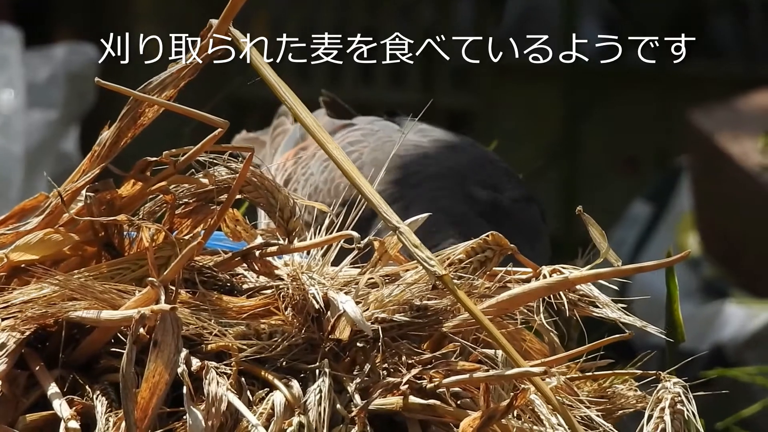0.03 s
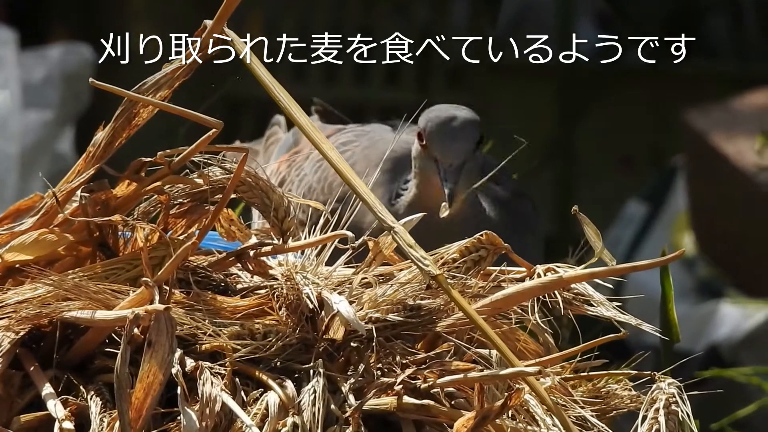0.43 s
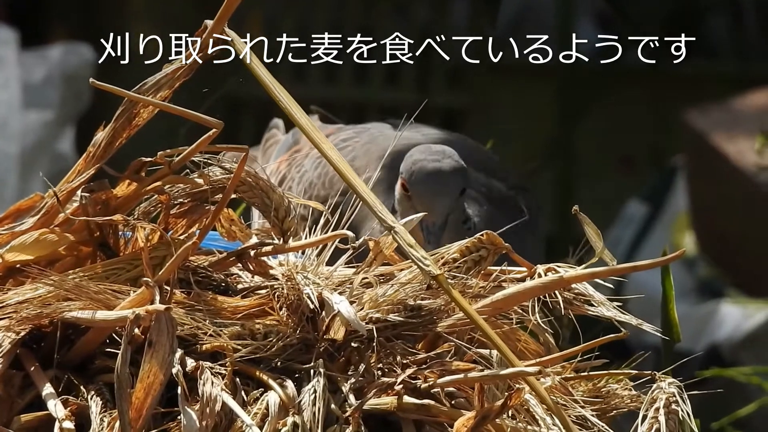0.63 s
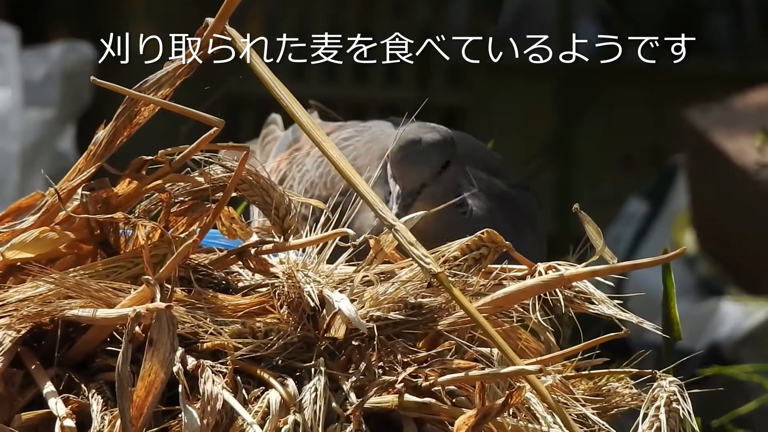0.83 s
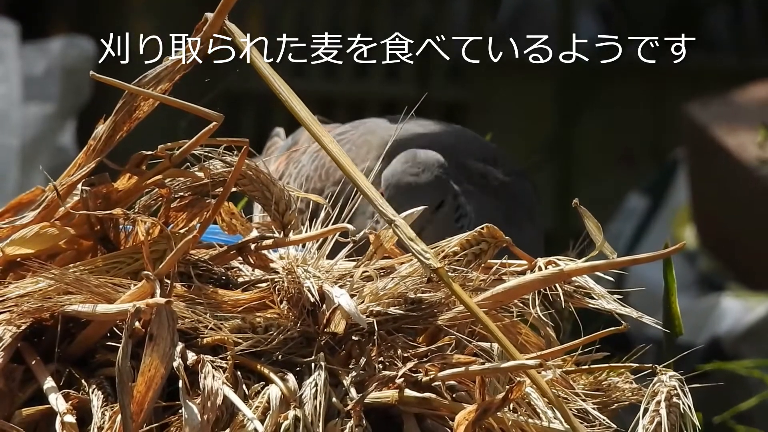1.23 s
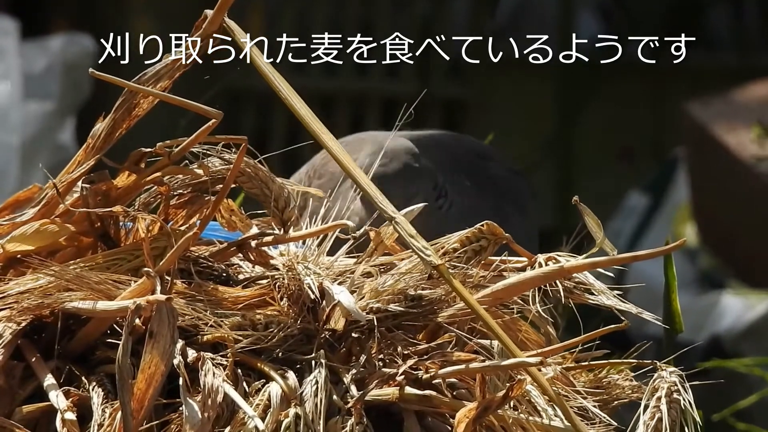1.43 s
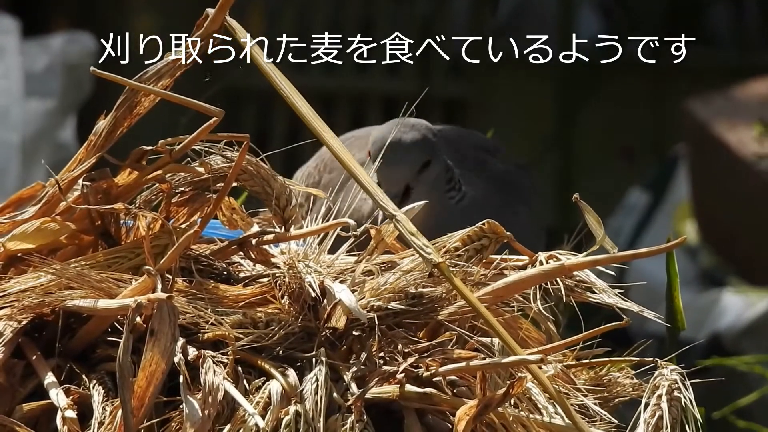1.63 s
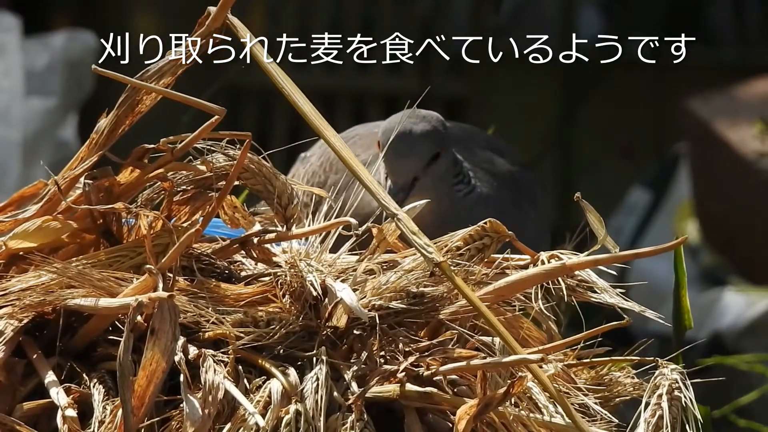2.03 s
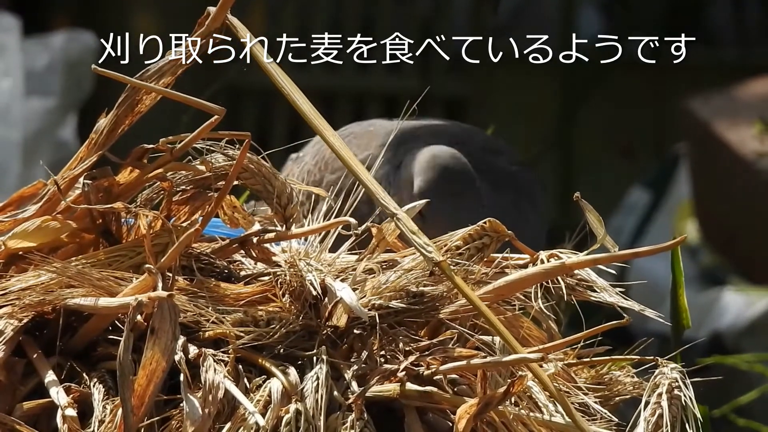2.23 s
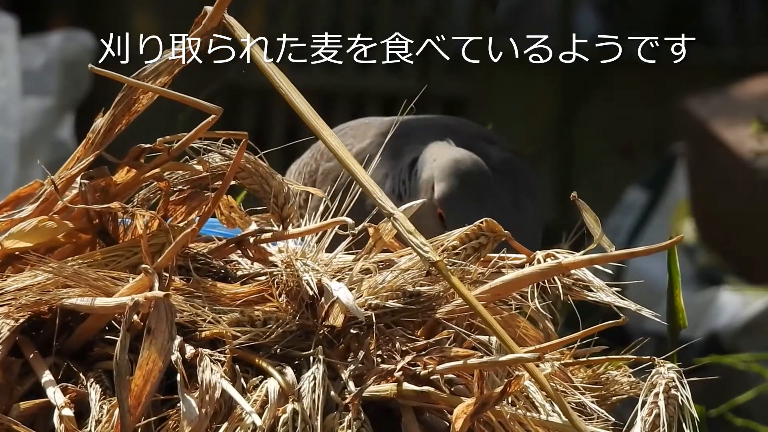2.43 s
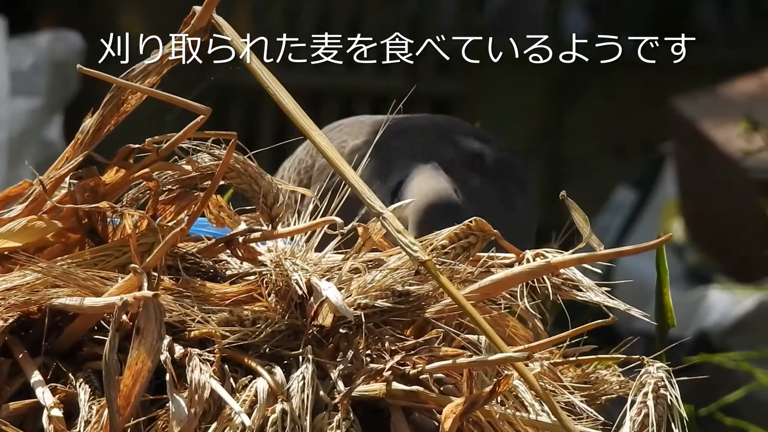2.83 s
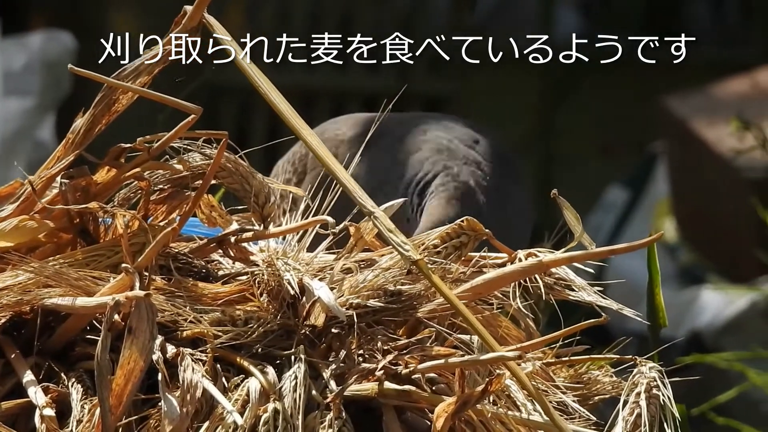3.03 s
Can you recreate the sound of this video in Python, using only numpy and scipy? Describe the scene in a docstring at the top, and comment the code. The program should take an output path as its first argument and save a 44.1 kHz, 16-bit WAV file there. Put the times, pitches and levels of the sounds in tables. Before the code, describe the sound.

Wind buffets the microphone in uneven gusts, with low rumbles and soft thumps over a quiet outdoor hiss. Beneath it, a dove pecks at dry straw with faint crackles, and one light hollow knock comes near the end.

```python
"""A dove pecks at a heap of cut wheat straw outdoors: faint dry crackles and a few light knocks.
Each snapping stalk releases a cluster of fibre clicks, the scuffing beak excites a broad resonance,
and near the end something hollow is struck and rings briefly. Much louder, gusts and eddies of wind
buffet the two microphone ports, each in its own way, over the steady hiss of a quiet field."""
import sys
import numpy as np
from scipy import signal
from scipy.fft import rfft, irfft
from scipy.io import wavfile
from scipy.ndimage import uniform_filter1d

SR = 44100
rng = np.random.default_rng(int(sys.argv[2]) if len(sys.argv) > 2 else 0)


def log_audio(samples):
    """Write samples as a 16-bit WAV file to the path given in sys.argv[1]."""
    # one column per channel
    frames = np.atleast_2d(samples).T
    # limit to full scale, then quantise
    limited = np.clip(frames, -1, 1)
    pcm = np.round(limited * 32767).astype(np.int16)
    wavfile.write(sys.argv[1], SR, pcm)


N = 141120

# Single eddies. Each row: centre time in seconds, level in dB, frequency in Hz,
# port (0 left, 1 right), level of the breakup in dB relative to the eddy.
EDDIES = [(.191,-6.5,138,1,-28), (.26,-6,118,0,-26), (0.315,-20,130,0,-25), (0.415,-18,109,0,-26),
          (0.519,-10.5,132,1,-22), (0.567,-10.5,100,0,-26), (0.617,-12.5,123,1,-26),
          (.688,-10.5,104,0,-17.5), (0.949,-12,118,1,-18), (.963,-8,146,0,-21.5), (1.009,-12,123,1,-21),
          (1.045,-18.5,184,0,-15), (1.178,-9,83.5,0,-20.5), (1.221,-7.5,125,0,-27), (1.355,-12,118,0,-19),
          (1.396,-8,143,1,-24.5), (1.59,-16,70.6,0,-23.5), (1.663,-6.5,101,0,-22), (1.714,-5.5,105,0,-29),
          (1.781,-11.5,126,1,-15.5), (1.807,-8.5,138,0,-26), (1.828,-10,131,0,-27), (2.235,-19.5,93,0,-24),
          (2.488,-14.5,104,1,-19.5), (2.521,-7,104,0,-26.5), (2.776,-19.5,91,1,-23.5),
          (3.135,-22.5,91,0,-21.5)]
PUFF_S = 0.0097  # Gaussian width of an eddy's breakup


def amp(db):
    """Amplitude ratio for a level in decibels."""
    return 10 ** (np.asarray(db) / 20)


def unit(x):
    """Normalisation to an rms of 1."""
    return x / np.sqrt(np.mean(x ** 2) + 1e-20)


def curve_at(points, hz):
    """Interpolation of a curve on a logarithmic frequency axis."""
    f, value = np.transpose(points)
    return np.interp(np.log(hz + 1), np.log(f + 1), value)


def colour(x, spectrum):
    """Zero-phase filtering by a spectrum in dB."""
    return irfft(rfft(x) * amp(curve_at(spectrum, np.fft.rfftfreq(N, 1 / SR))), N)


def wander(hz):
    """Low-pass noise: an independent random drift in each channel."""
    f = np.fft.rfftfreq(N, 1 / SR)
    return unit(irfft(rfft(rng.standard_normal((2, N))) * np.exp(-(f / hz) ** 2), N))


def burst(start, rise_s, decay_s):
    """Envelope of a damped transient: a linear rise centred on the start, and exponential decay."""
    t = np.arange(N) / SR - start
    return np.clip(t / rise_s + .5, 0, 1) * np.exp(-np.maximum(t, 0) / decay_s)


def spread(x, cross, right_db):
    """Crosstalk: each port hears part of the other's sound, with the balance tipped to the right."""
    return (x + cross * x[::-1]) / np.hypot(1, cross) * amp([[-right_db / 2], [right_db / 2]])


def field_hiss():
    """Partly coherent noise: the distant wash of the field, its spectrum drifting in faint patches."""
    # Spectrum of the hiss. Each row: frequency in Hz, relative spectral level in dB.
    spectrum = [(30, 13.5), (150, 13), (400, 3.5), (600, 4), (900, 2), (1300, 1.5), (2200, -2.5),
                (3400, -4), (4800, -2), (6500, -1), (8000, -6.5), (10000, -10.5), (15500, -16.5)]
    # Likeness of the two channels. Each row: frequency in Hz, correlation from 0 to 1.
    correlation = [(100, 0.37), (1400, 0.41), (2600, 0.16), (5500, 0.26), (14000, .02)]
    # Balance of the hiss. Each row: frequency in Hz, left minus right in dB.
    balance = [(200, -3), (1200, 0.5), (6000, -3), (10000, 0)]
    level_db, patch_db = -54, 1.5
    hz = np.fft.rfftfreq(1024, 1 / SR)
    a, b, c, d, patches = rng.standard_normal((N // 256 + 5, len(hz), 5)).T
    patches = unit(uniform_filter1d(uniform_filter1d(patches, size=12, axis=0), size=12, axis=1))
    same = np.clip(curve_at(correlation, hz), -1, 1)[:, None]
    left = a + 1j * b
    right = same * left + np.sqrt(1 - same ** 2) * (c + 1j * d)
    tilt = amp(curve_at(balance, hz) / 2)[:, None]
    frames = np.array([left * tilt, right / tilt])
    frames *= amp(curve_at(spectrum, hz)[:, None] + patch_db * patches)
    return amp(level_db) * unit(signal.istft(frames, nperseg=1024, noverlap=768)[1][:, :N])


def turbulence(spectrum):
    """Turbulent pressure: coloured noise, uncorrelated between the ports, its slow swells evened out."""
    noise = colour(rng.standard_normal((2, N)), spectrum)
    power = uniform_filter1d(uniform_filter1d(noise ** 2, 2200, axis=1), 1100, axis=1)
    return noise / np.sqrt(power + 1e-20)


def wind():
    """Turbulent flow over the ports: a lumpy rumble follows the gusts, and flutter grows faster."""
    # Wind strength. Each row: time in seconds, left level in dB, right level in dB.
    gusts = [(0, -38.5, -37), (0.13, -28.5, -33.5), (0.225, -23.5, -28), (0.35, -45, -62),
             (0.48, -32, -29.5), (0.59, -20.5, -25), (0.7, -28, -29.5), (0.805, -45.5, -45),
             (0.883, -23, -20), (0.96, -18, -22), (1.08, -36, -37), (1.135, -18, -21), (1.21, -24, -28),
             (1.28, -28, -51), (1.37, -29, -27.5), (1.44, -31.5, -35), (1.55, -40.5, -39.5),
             (1.675, -26, -27.5), (1.755, -34, -25), (1.835, -24, -25), (1.91, -28, -36), (1.99, -40, -40),
             (2.125, -30.5, -42), (2.22, -38, -33.5), (2.33, -50, -51), (2.44, -36.5, -40.5),
             (2.5, -20.5, -28), (2.58, -45.5, -43), (2.8, -47, -44.5), (2.874, -27.5, -38),
             (2.991, -35.5, -33.5), (3.08, -46, -50), (3.16, -44, -41.5)]
    # Spectrum of the rumble. Each row: frequency in Hz, relative spectral level in dB.
    rumble = [(15, -40), (35, -19), (60, 2), (100, -2), (150, -9), (220, -27), (320, -47.5), (600, -53),
              (1500, -83)]
    # Flutter of strong gusts. Each row: frequency in Hz, relative spectral level in dB.
    flutter = [(40, -10.5), (110, -5.5), (180, 4.5), (250, -12), (350, -21), (600, -39.5), (1500, -80)]
    lump_db, strong_db, flutter_offset_db, flutter_growth = 2.13, -19.5, -5, 1.94
    times, left, right = np.transpose(gusts)
    t = np.arange(N) / SR
    gust_db = np.array([np.interp(t, times, left), np.interp(t, times, right)])
    rumble_db = gust_db + lump_db * wander(hz=30.4)
    flutter_db = strong_db + flutter_offset_db + flutter_growth * (rumble_db - strong_db)
    return amp(rumble_db) * turbulence(rumble) + amp(flutter_db) * turbulence(flutter)


def flow_displacement():
    """Gain on the wind: a passing eddy briefly displaces the surrounding flow from its port."""
    dip_db = -3.5
    t, nearness = np.arange(N) / SR, np.zeros((2, N))
    for centre, _, _, port, _ in EDDIES:
        nearness[round(port)] += np.exp(-((t - centre) / (2 * PUFF_S)) ** 2)
    return amp(dip_db * np.minimum(nearness, 1))


def eddies():
    """Each vortex is one short swing of pressure, mostly at one port, breaking up into a small puff."""
    # Breakup of an eddy. Each row: frequency in Hz, relative spectral level in dB.
    puff_spectrum = [(80, -6), (180, 7.5), (280, -9), (400, -16), (700, -25), (1500, -54)]
    width_cycles, leak_db = 0.56, -42
    t, out = np.arange(N) / SR, np.zeros((2, N))
    breakup = turbulence(puff_spectrum)
    for centre, db, hz, port, puff_db in EDDIES:
        cycles = (t - centre) * hz
        envelope = 1 / np.cosh(np.clip(cycles / width_cycles * np.pi / 2, -20, 20))
        swing = envelope * np.sin(2 * np.pi * cycles + rng.normal(0, 0.41))
        puff = amp(puff_db) * np.exp(-.5 * ((t - centre) / PUFF_S) ** 2) * breakup
        far_port = np.arange(2) != round(port)
        out += amp(db + leak_db * far_port)[:, None] * (swing + puff)
    return out


def scatter(x):
    """Diffuse reflection from things standing around the heap: a short, exponentially decaying tail."""
    level_db, t60_s, delay_s = -6, 0.086, .003
    t = np.arange(SR // 2) / SR
    tail = rng.standard_normal((2, len(t))) * amp(-60 * t / t60_s) * (t > delay_s)
    return amp(level_db) * signal.fftconvolve(x, tail / np.linalg.norm(tail[0]), axes=1)[:, :N]


def hollow_knock():
    """Impact on a hollow body: a dull contact tick and the free decay of its damped modes."""
    # Modes of the body. Each row: frequency in Hz, relative level in dB, 60 dB decay time in seconds.
    modes = [(685, -18, 0.025), (820, 0.5, 0.039), (1150, -8, 0.038), (1290, -6, 0.047), (1860, -14, 0.02),
             (2290, -5.5, .015), (2690, -5, 0.018)]
    # Contact noise. Each row: frequency in Hz, relative spectral level in dB.
    tick_spectrum = [(400, -1), (900, -1.5), (2700, -7), (3500, -15), (12000, -28)]
    start_s, ring_db, tick_db = 3.187, -34, -36.5
    t = np.maximum(np.arange(N) / SR - start_s, 0)
    ring = sum((-1) ** k * amp(db - 60 * t / t60) * np.sin(2 * np.pi * hz * t)
               for k, (hz, db, t60) in enumerate(modes))
    tick = unit(colour(rng.standard_normal((2, N)), tick_spectrum))
    return amp(ring_db) * ring + amp(tick_db) * burst(start_s, rise_s=0.0039, decay_s=0.0072) * tick


def pecks():
    """Friction of the beak on a stalk: a short burst of noise around one broad resonance."""
    # Dull pecks. Each row: start in seconds, level in dB, centre frequency in Hz.
    scuffs = [(0.361, -54.5, 2280), (0.385, -62, 2600), (1.214, -49.5, 1850), (1.340, -53, 3360),
              (1.36, -54, 3040), (1.416, -58, 2310), (1.929, -54, 2470)]
    width_octaves = 0.42
    f, out = np.fft.rfftfreq(N, 1 / SR) + 1, np.zeros((2, N))
    for start, db, hz in scuffs:
        resonance = np.exp(-.5 * (np.log2(f / hz) / width_octaves) ** 2)
        noise = unit(irfft(rfft(rng.standard_normal((2, N))) * resonance, N))
        out += amp(db) * burst(start, rise_s=0.0081, decay_s=.009) * noise
    return spread(out, cross=0.54, right_db=1.0)


def fibre_clicks(per_s, spread_db):
    """Shot noise: dry fibres click at random instants, with uneven strength."""
    # Spectrum of dry straw. Each row: frequency in Hz, relative spectral level in dB.
    spectrum = [(500, -34), (2000, -36), (3300, -14.5), (4500, -3), (5500, -3), (6600, 2), (7300, -3.5),
                (8700, -9.5), (10500, -23), (15500, -25)]
    strength = amp(spread_db * np.minimum(rng.exponential(1, (2, N)), 4))
    clicks = strength * rng.choice([-1, 1], (2, N)) * (rng.random((2, N)) < per_s / SR)
    return unit(colour(clicks, spectrum))


def straw():
    """Brittle fracture: a stalk snaps in a dense clump of clicks and settles; the heap stirs faintly."""
    # Straws snapping under the beak. Each row: start in seconds, level in dB, decay time in seconds.
    snaps = [(0.028, -51.5, 0.012), (0.231, -49, 0.0052), (0.373, -55.5, 0.015), (0.778, -47.5, 0.0046),
             (1.35, -44.5, 0.007), (1.372, -43.5, 0.0095), (1.4302, -35.5, 0.0031), (1.618, -53, 0.024),
             (1.646, -57.5, 0.015), (1.943, -48, 0.003), (2.574, -54, 0.0058), (2.782, -54, 0.017),
             (3.197, -39, 0.0046)]
    settle_db, settle_s, stir_db = -22, 0.066, -72
    envelope = np.zeros(N)
    for start, db, decay_s in snaps:
        rise_s = .8 * decay_s  # slow snaps also start softly
        settling = amp(settle_db) * burst(start, rise_s, settle_s)
        envelope += amp(db) * (burst(start, rise_s, decay_s) + settling)
    crackle = envelope * fibre_clicks(per_s=3000, spread_db=3.6)
    stirring = amp(stir_db) * fibre_clicks(per_s=65, spread_db=2)
    return spread(crackle + stirring, cross=0.37, right_db=1.0)


def scene():
    """Superposition of the feeding dove, its reflections, the field and the wind at the ports."""
    dove = straw() + pecks() + hollow_knock()
    return dove + scatter(dove) + field_hiss() + wind() * flow_displacement() + eddies()


def record(dry):
    """Band limiting: the microphone's second-order low cut, then the recorder's steep low-pass."""
    low_cut_hz, high_cut_hz = 18, 15820
    hz = np.fft.rfftfreq(2 * N, 1 / SR)
    high_pass = hz ** 2 / np.hypot(hz ** 2, low_cut_hz ** 2)
    cut = irfft(rfft(dry, 2 * N) * high_pass)[:, :N]
    low_pass = signal.firwin(801, high_cut_hz, window=("kaiser", 9), fs=SR)
    return signal.oaconvolve(cut, low_pass[None], "same")


dry = scene()
out = record(dry)
log_audio(out)
```